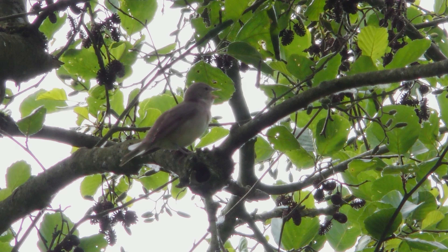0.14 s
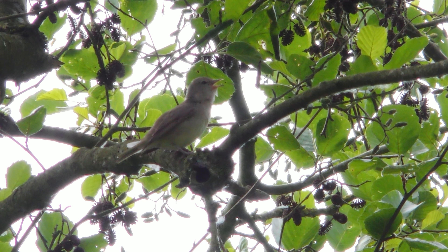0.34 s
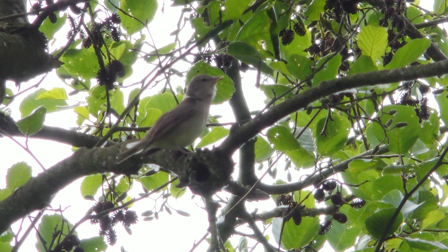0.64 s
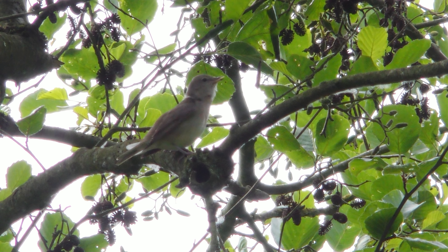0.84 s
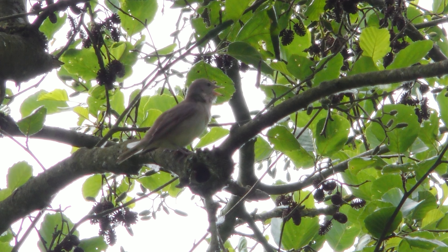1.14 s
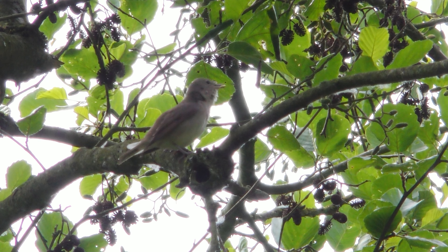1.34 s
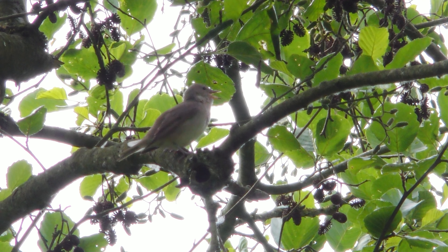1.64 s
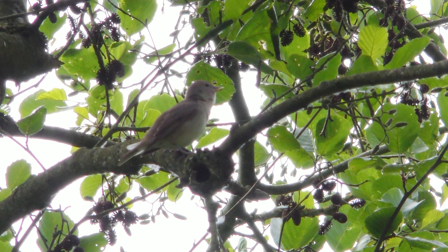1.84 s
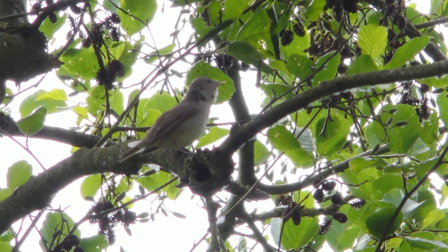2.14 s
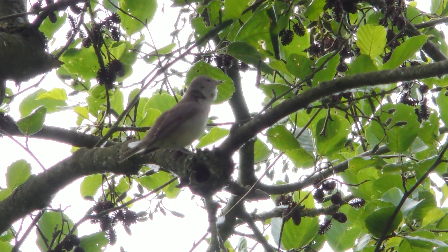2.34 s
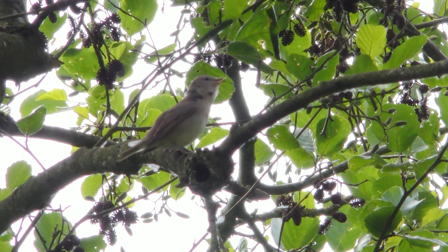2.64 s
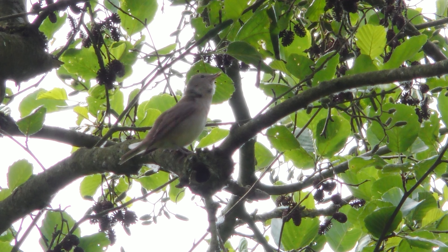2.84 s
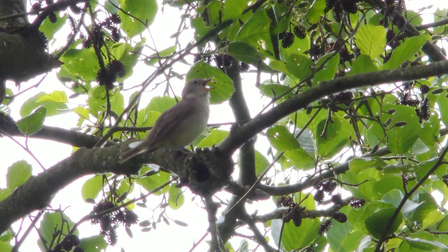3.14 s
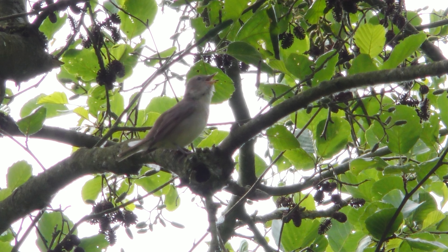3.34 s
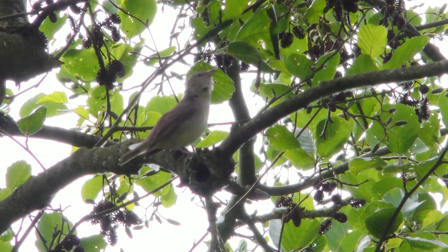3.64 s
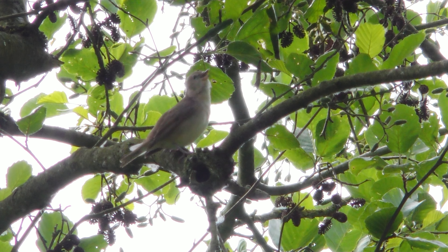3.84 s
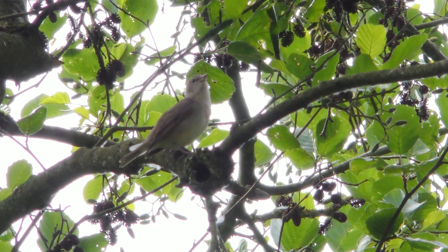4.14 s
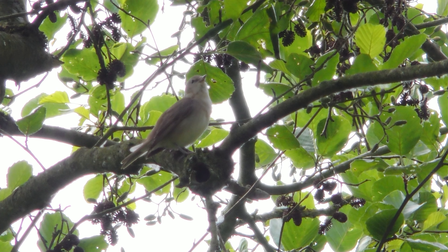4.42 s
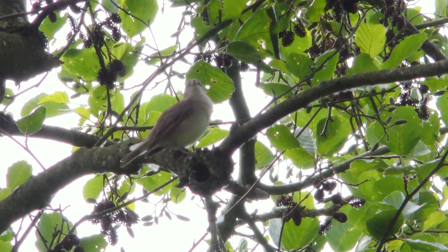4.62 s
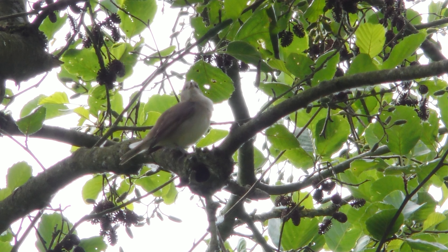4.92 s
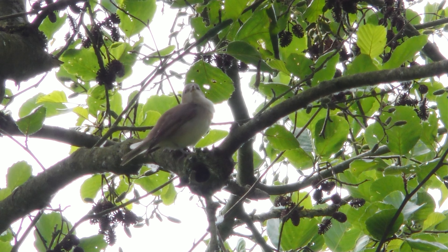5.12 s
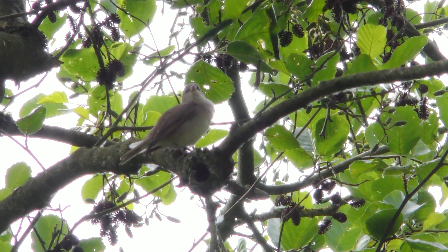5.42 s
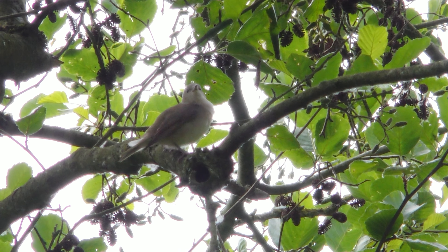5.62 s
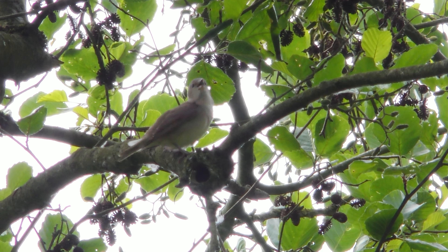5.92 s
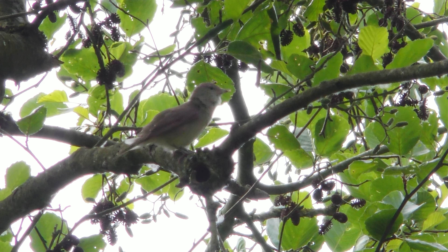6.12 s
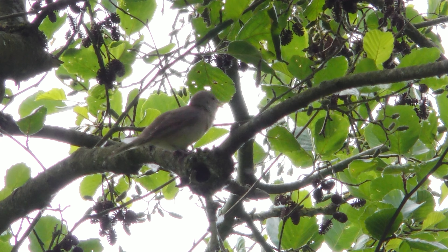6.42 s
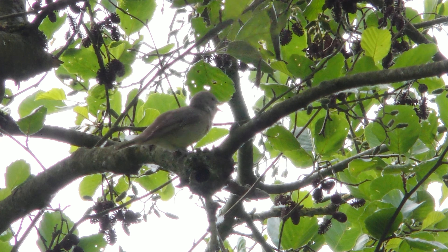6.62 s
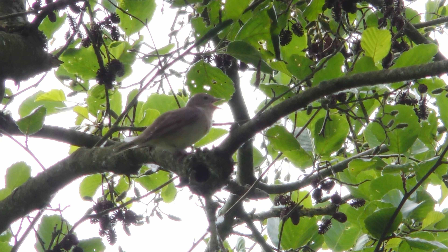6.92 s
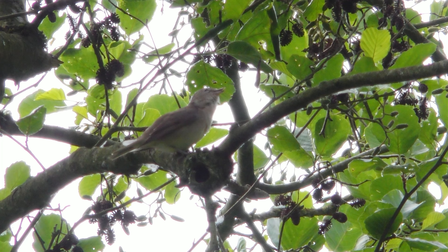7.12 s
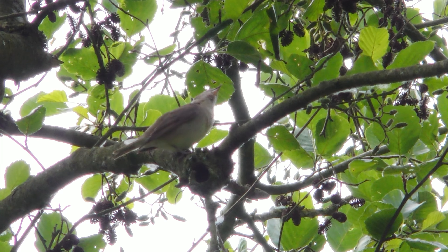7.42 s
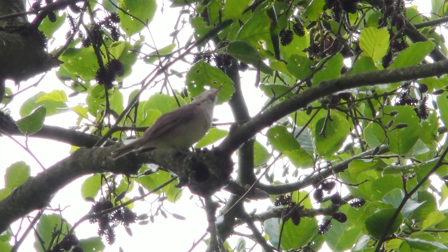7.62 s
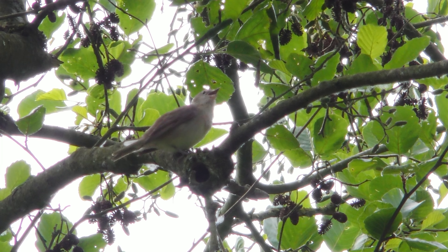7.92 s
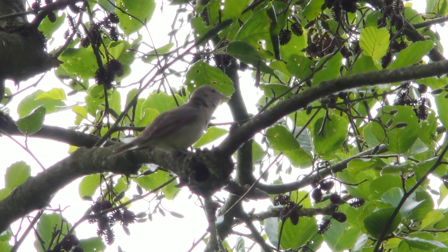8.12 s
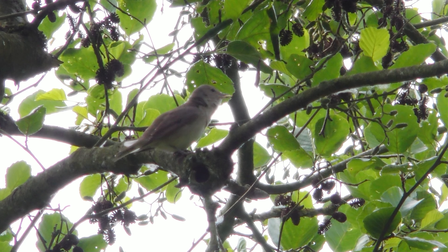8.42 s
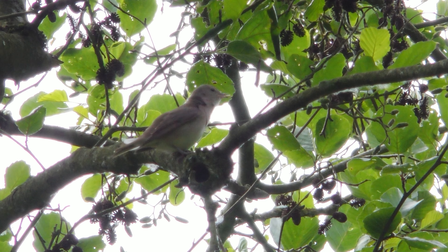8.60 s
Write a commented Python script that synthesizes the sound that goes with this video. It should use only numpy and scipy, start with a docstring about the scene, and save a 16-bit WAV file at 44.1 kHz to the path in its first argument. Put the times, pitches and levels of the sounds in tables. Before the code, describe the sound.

A small warbler perched in a leafy tree sings almost continuously: quick clear whistles, sliding chirps, clicks and short buzzy rattles, constantly changing. The brightest bursts come in the first half, around two to four seconds. A more distant bird repeats a thin, high falling note in brief series. Branches return short airy echoes. The microphone hears the singer fairly clearly, nearly mono, over a steady soft hiss.

```python
"""Warbler on a branch, neighbour further off

A warbler sings fast whistled notes, often with both sides of its syrinx at once: each is a sine on a path
of pitch and level. A neighbour at a distance repeats one high hooked note, flickering over the long path.
Leaves and trunks scatter the song back as random echoes. Under the birds lies a steady, nearly mono
hiss of shaped noise that steps down below 800 Hz.
"""
import sys
import numpy as np
from scipy import signal
from scipy.fft import rfft, irfft, next_fast_len
from scipy.io import wavfile
from scipy.ndimage import uniform_filter1d

SR = 44100
rng = np.random.default_rng(int(sys.argv[2]) if len(sys.argv) > 2 else 0)


def materialize(psi):
    """Save the field psi as 16-bit PCM at rate SR to the path in sys.argv[1].

    A 1-D psi becomes a single channel; in a 2-D psi each row is a channel.
    """
    bounded = np.clip(np.atleast_2d(psi).T, -1, 1)
    quanta = np.round(bounded * 32767).astype(np.int16)
    wavfile.write(sys.argv[1], SR, quanta)


def nominal_scale(level):
    """Amplitude ratio for a level in decibels (scalar or array-like)."""
    x = np.asarray(level, float) / 20
    return 10 ** x


N = 386316  # length in samples

ARCH_ROUND = 0.81  # power of the half sine in arches and warbles; below 1 is rounder
PATH_HZ = 2000  # points per second on the paths of warbles and rattles


def coloured(points, offset_db):
    """Noise whose spectrum follows (frequency [Hz], relative level [dB]) points on a log axis."""
    hz, db = np.transpose(points)
    size = next_fast_len(N)
    bins_hz = np.arange(size // 2 + 1) * SR / size
    level_db = np.interp(np.log(bins_hz + 1), np.log(hz), db) + offset_db
    white = rfft(rng.standard_normal(size))
    return irfft(white * nominal_scale(level_db), size)[:N]


def hiss():
    """Steady background hiss: one shaped noise for the middle, a fainter shaped noise for the sides."""
    # spectrum common to both channels: (frequency [Hz], relative level [dB])
    hiss_mid = [(15, -55.5), (45, -64.5), (65, -73.5), (150, -76.5), (760, -77.5), (800, -65), (850, -66),
                (875, -72.5), (905, -65.5), (2000, -65.5), (5000, -65), (8000, -68.5), (15600, -71),
                (15780, -130)]
    # spectrum of the left-right difference: (frequency [Hz], relative level [dB])
    hiss_side = [(15, -58.5), (60, -87), (250, -112), (780, -108), (900, -100), (1100, -110), (3500, -94),
                 (5200, -100), (6300, -81), (7200, -102.5), (15600, -108.5), (15780, -150)]
    return coloured(hiss_mid, 27.24), coloured(hiss_side, 26.6)


def wobble(rate):
    """Smooth chance with spread 1 that changes about rate times a second."""
    k = max(int(SR / rate), 1)
    smooth = uniform_filter1d(uniform_filter1d(rng.standard_normal(N), k), k)
    return smooth / smooth.std()


def add_whistle(out, note, waver, flutter_db):
    """One whistle: a sine on the pitch and level path, with soft edges."""
    edge_s = 0.005
    s, hz, db = np.transpose(note)
    s = np.maximum.accumulate(s)
    first = max(int((s[0] - edge_s / 2) * SR), 0)
    last = min(int((s[-1] + edge_s / 2) * SR), N)
    i = np.arange(first, last)
    t = i / SR
    edge = np.clip(np.minimum(t - t[0], t[-1] - t) / edge_s, 0, 1)
    # notes below -38 dB come through more foliage and arrive up to 4 times as ragged
    ragged = 1 + np.clip(-38 - db.max(), 0, 9) / 3
    # muscles round the corners of the path
    path_hz = uniform_filter1d(np.interp(t, s, hz), 60, mode="nearest")
    pitch_hz = path_hz * (1 + ragged * waver[i])
    phase = 2 * np.pi * (np.cumsum(pitch_hz) / SR + rng.random())
    level_db = np.interp(t, s, db) + ragged * flutter_db[i]
    out[i] += np.sqrt(2) * edge * nominal_scale(level_db) * np.sin(phase)


def warbler():
    """The near bird: every kind of note bends pitch and level by its own rule; levels are before the mix."""
    # long shaped phrases, one path each: (time [s], pitch [Hz], level [dB])
    phrases = [
        [(1.193, 4130, -43), (1.217, 4070, -25), (1.247, 3750, -28), (1.258, 3570, -24), (1.269, 3080, -28.5),
         (1.275, 2530, -38), (1.29, 3380, -32), (1.302, 3600, -40)],
        [(1.514, 5920, -36), (1.522, 4000, -25), (1.525, 3530, -30.5), (1.542, 3600, -25), (1.548, 4060, -36),
         (1.56, 4150, -34), (1.57, 3600, -28.5), (1.593, 2750, -29.5), (1.612, 2600, -42)],
        [(3.372, 4370, -34), (3.388, 4455, -20), (3.392, 3780, -24), (3.398, 3460, -18), (3.412, 3250, -32),
         (3.43, 3168, -20), (3.458, 3120, -19), (3.467, 2960, -41)],
        [(4.131, 3100, -35), (4.139, 3670, -28), (4.146, 5240, -29), (4.153, 4600, -27.5), (4.16, 4250, -23),
         (4.167, 4390, -29), (4.171, 4020, -31), (4.176, 4480, -26)],
        [(8.502, 2165, -50), (8.534, 2510, -27), (8.539, 2850, -31), (8.552, 2296, -40), (8.562, 2630, -30),
         (8.57, 2410, -33), (8.584, 2580, -35.5), (8.59, 1800, -37), (8.597, 1810, -52)],
    ]
    # plain slurs and strokes: (start [s], end [s], first pitch [Hz], last pitch [Hz], middle level [dB])
    slurs = [(0.001, 0.006, 3530, 3680, -36), (0.021, 0.05, 3630, 3540, -48),
             (0.076, 0.093, 4060, 4180, -39), (0.078, 0.095, 3070, 3180, -37.5),
             (0.127, 0.147, 4060, 4020, -40), (0.128, 0.15, 5090, 5020, -41.5),
             (0.251, 0.294, 3290, 4140, -47), (0.272, 0.281, 3960, 5450, -37),
             (0.295, 0.3, 5560, 3670, -32), (0.299, 0.307, 5300, 5000, -35.5),
             (0.366, 0.386, 2100, 3140, -44), (0.374, 0.398, 4440, 3950, -49),
             (0.442, 0.452, 2960, 2580, -32.5), (0.55, 0.558, 2190, 2920, -37.5),
             (0.566, 0.577, 2000, 2500, -39.5), (0.585, 0.597, 1950, 2450, -40),
             (0.606, 0.624, 2000, 2300, -40.5), (0.624, 0.674, 5280, 5020, -45.5),
             (0.725, 0.83, 4700, 4870, -49.5), (1.008, 1.02, 3250, 1790, -41),
             (1.065, 1.078, 4540, 3130, -33.5), (1.072, 1.081, 5180, 3780, -26.5),
             (1.087, 1.097, 4930, 4800, -32.5), (1.139, 1.144, 3300, 1900, -35.5),
             (1.343, 1.365, 5020, 5100, -44), (1.363, 1.37, 5070, 4000, -40),
             (1.376, 1.385, 4040, 4740, -37), (1.418, 1.425, 2200, 2900, -40),
             (1.425, 1.441, 2180, 2230, -38.5), (4.185, 4.199, 3465, 3400, -27.5),
             (5.076, 5.13, 4580, 4600, -50), (1.426, 1.438, 3000, 3050, -43),
             (1.655, 1.668, 5250, 4900, -33), (1.672, 1.706, 5140, 5470, -29),
             (1.707, 1.737, 5400, 5500, -39), (1.66, 1.71, 3790, 4030, -41.5),
             (1.811, 1.818, 2380, 2900, -41), (1.818, 1.827, 2410, 2170, -39),
             (1.816, 1.832, 3030, 3140, -40), (1.956, 1.996, 1815, 2060, -40.5),
             (2.004, 2.046, 2620, 1787, -37), (1.999, 2.055, 5630, 5460, -47),
             (2.046, 2.109, 1750, 1554, -48), (2.229, 2.355, 2070, 1914, -38),
             (2.421, 2.479, 1470, 1520, -49), (2.875, 2.91, 1556, 1530, -53),
             (3.204, 3.212, 5380, 4760, -28), (3.217, 3.224, 5410, 4450, -22.5),
             (3.229, 3.242, 5350, 4245, -24.5), (3.246, 3.256, 5090, 4260, -22),
             (3.256, 3.261, 5040, 4260, -26), (3.301, 3.326, 2745, 2480, -33),
             (3.382, 3.392, 6250, 4500, -37), (3.577, 3.613, 4170, 3870, -52),
             (3.891, 4.122, 5130, 5000, -52), (4.315, 4.33, 3950, 3300, -48),
             (3.701, 3.71, 2600, 1890, -44), (3.747, 3.762, 2240, 1780, -37.5),
             (3.802, 3.817, 2360, 1800, -38), (3.835, 3.876, 1989, 1890, -37),
             (3.921, 3.941, 4800, 3310, -42), (4.377, 4.46, 4040, 4080, -50),
             (4.617, 4.708, 4950, 5020, -48), (4.652, 4.664, 4460, 3490, -41),
             (5.011, 5.075, 4597, 4620, -41), (5.43, 5.478, 5550, 4670, -52),
             (5.772, 5.898, 3920, 3986, -50.5), (5.779, 5.8, 2820, 2830, -45),
             (5.867, 5.878, 2600, 3060, -40), (5.93, 5.963, 1926, 1890, -50.5),
             (6.045, 6.075, 3610, 3050, -44), (6.065, 6.1, 2310, 2350, -49), (6.11, 6.19, 1800, 1850, -55),
             (6.572, 6.599, 3750, 4160, -37), (6.601, 6.702, 4110, 3880, -43),
             (6.938, 6.953, 4980, 4050, -41), (6.31, 6.32, 3360, 2550, -35),
             (6.322, 6.347, 2530, 1440, -48), (6.371, 6.395, 1720, 3430, -37),
             (6.601, 6.64, 5500, 5630, -50), (6.66, 6.72, 5480, 5400, -48), (6.76, 6.786, 3510, 2290, -46),
             (6.796, 6.831, 5200, 5000, -47), (6.968, 7.012, 6440, 6120, -49.5),
             (7.114, 7.132, 2795, 2770, -45), (7.279, 7.34, 3950, 4120, -49),
             (7.325, 7.338, 3300, 3770, -35.5), (7.336, 7.358, 2680, 2070, -40),
             (7.843, 7.852, 5170, 3500, -34), (7.903, 7.912, 5050, 3500, -34),
             (7.42, 7.437, 2920, 3050, -45), (7.558, 7.594, 3000, 3170, -40.5),
             (7.66, 7.682, 3490, 3390, -40), (7.997, 8.034, 5120, 3860, -32.5),
             (8.055, 8.18, 3450, 3450, -50), (8.115, 8.136, 4080, 4034, -31),
             (8.136, 8.172, 2800, 1830, -42), (8.187, 8.21, 3230, 3340, -42),
             (8.21, 8.266, 3520, 3760, -43), (8.27, 8.361, 3590, 3700, -51),
             (8.266, 8.285, 2100, 2340, -43.5), (8.29, 8.322, 1670, 1580, -46.5),
             (8.372, 8.383, 3304, 2720, -36.5), (8.379, 8.395, 2774, 3160, -37),
             (8.424, 8.434, 3820, 2930, -40), (8.653, 8.666, 1500, 1500, -52),
             (8.74, 8.756, 2280, 2100, -34)]
    # quick rise onto a note that dies away: (start [s], end [s], foot [Hz], knee [Hz], level [dB])
    flicks = [(0.007, 0.06, 3680, 5020, -27.5), (1.768, 1.817, 3170, 4240, -25.5),
              (5.81, 5.836, 2410, 2830, -28.5), (6.47, 6.488, 4230, 5900, -30),
              (8.088, 8.123, 1870, 2630, -30)]
    # arches and scoops, out and back: (start [s], end [s], edge [Hz], turn [Hz], loudest level [dB])
    arches = [(0.235, 0.301, 4870, 5470, -37.5), (1.658, 1.733, 4020, 4420, -34),
              (0.622, 0.737, 1890, 2010, -37.5), (2.797, 2.871, 1710, 2023, -33),
              (3.047, 3.11, 5900, 6260, -41), (3.083, 3.118, 3650, 5360, -22),
              (3.53, 3.546, 3530, 2756, -23), (3.569, 3.582, 3570, 2760, -25),
              (6.444, 6.472, 4450, 4110, -38), (6.539, 6.571, 3910, 3280, -24),
              (7.431, 7.468, 3210, 3890, -33), (7.594, 7.624, 3230, 3380, -30),
              (7.679, 7.707, 3590, 3880, -31), (7.706, 7.733, 3600, 4030, -33),
              (7.739, 7.765, 3890, 4130, -29.5)]
    # slurs that grow and are cut off: (start [s], end [s], first [Hz], last [Hz], peak level [dB])
    swells = [(0.41, 0.441, 4020, 2860, -24.5), (0.799, 0.851, 2625, 2525, -28.5),
              (1.374, 1.397, 3100, 4700, -28), (2.179, 2.215, 3230, 3066, -18),
              (2.558, 2.594, 2400, 2165, -26.5), (2.905, 2.956, 1750, 1878, -29),
              (3.539, 3.55, 3200, 3550, -20), (3.579, 3.587, 3200, 3590, -18),
              (3.122, 3.158, 3300, 3994, -19), (3.935, 3.973, 2600, 2490, -22.5),
              (7.613, 7.656, 3370, 3570, -26), (6.886, 6.94, 4500, 5280, -32.5),
              (8.428, 8.441, 2980, 2830, -24.5)]
    # quick fall onto a held note that creeps up: (start [s], end [s], top [Hz], knee [Hz], level [dB])
    hooks = [(0.655, 0.71, 5100, 3420, -46), (0.972, 1.04, 5000, 4390, -43), (5.068, 5.14, 4500, 3770, -46),
             (2.038, 2.104, 5200, 3340, -45), (2.339, 2.404, 5000, 3870, -45.5),
             (2.721, 2.785, 5300, 3380, -44), (2.861, 2.95, 4800, 4030, -45.5),
             (3.014, 3.084, 5000, 3830, -41.5), (3.512, 3.58, 4450, 3950, -37),
             (3.688, 3.748, 4750, 4380, -42.5), (4.238, 4.32, 5000, 3970, -33.5),
             (4.785, 4.833, 4650, 3450, -48), (6.158, 6.22, 4800, 3370, -47.5),
             (6.835, 6.89, 4200, 3390, -45), (7.172, 7.249, 4500, 3850, -41),
             (7.459, 7.59, 5150, 4300, -41), (7.993, 8.05, 3950, 3430, -41),
             (8.203, 8.242, 5800, 5100, -53)]
    # fast even vibrato that opens and closes: (start [s], end [s], low [Hz], top [Hz], peak level [dB])
    warbles = [(0.838, 0.909, 2360, 3230, -32.5), (2.597, 2.732, 2053, 2870, -24.5)]
    # rattles: (start [s], centre [Hz], swing [Hz], beat rate [1/s], level [dB])
    rattles = [(3.05, 6060, 500, 120, -39), (6.025, 3510, 900, 77, -40), (6.44, 5300, 1200, 124, -41.5),
               (6.782, 2740, 480, 98, -37), (6.94, 4470, 900, 93, -42), (6.985, 4450, 900, 100, -45.5),
               (7.278, 4440, 800, 110, -45), (7.953, 5270, 1400, 82, -35.5), (7.955, 2770, 645, 93, -44),
               (8.686, 6000, 900, 99, -50)]
    out = np.zeros(N)
    waver = 0.003 * wobble(300)  # fraction of the pitch
    flutter_db = 0.9 * wobble(250)
    notes = list(phrases)
    notes += [bend(*row, foot_db=1, fade_db_per_s=47) for row in hooks]
    notes += [bend(*row, foot_db=15, fade_db_per_s=396) for row in flicks]
    for rule, rows in ((slur, slurs), (arch, arches), (swell, swells), (warble, warbles), (trill, rattles)):
        notes += [rule(*row) for row in rows]
    for note in notes:
        add_whistle(out, note, waver, flutter_db)
    return out


def slur(start, end, first_hz, last_hz, db):
    """A straight glide whose level sags in the middle."""
    sag_db = 3
    middle = ((start + end) / 2, (first_hz + last_hz) / 2, db)
    return [(start, first_hz, db + sag_db), middle, (end, last_hz, db + sag_db)]


def scatter(x, db, t60, delay_s, density):
    """Reflections: random taps, about density a second, that fade 60 dB in t60; total energy db."""
    t = np.arange(int(t60 * SR)) / SR
    struck = rng.random(len(t)) < density / SR
    taps = rng.standard_normal(len(t)) * struck * (t > delay_s)
    taps = taps * nominal_scale(-60 * t / t60)
    taps = taps * nominal_scale(db) / np.sqrt(np.sum(taps ** 2) + 1e-18)
    return signal.fftconvolve(x, taps)[:N]


def rustle(x, rate, sway_s):
    """Moving leaves shake the path length, which smears a pure note."""
    return np.interp(np.arange(N) + sway_s * SR * wobble(rate), np.arange(N), x)


def side_echo(birds):
    """Faint early reflections, opposite in the two channels, give the birds a little width."""
    return scatter(birds, -33, t60=0.038, delay_s=0.001, density=3000)


def leaf_light(birds):
    """Leaves and twigs throw back short waves better than long ones: a high-pass at 2600 Hz."""
    return signal.sosfilt(signal.butter(2, 2600, "high", fs=SR, output="sos"), birds)


def branch_echo(bright):
    """Close echoes from branches: a short burst of sparse reflections, shaken a little."""
    return rustle(scatter(bright, -4, t60=0.05, delay_s=0.003, density=1500), 25, 0.00003)


def bend(start, end, first_hz, knee_hz, db, foot_db, fade_db_per_s):
    """The syrinx muscles settle onto the knee pitch, then the hold creeps up and fades."""
    settle_s, creep_hz_per_s = 0.008, 2490
    t = np.linspace(0, end - start, num=33)
    away = np.exp(-t / settle_s)
    hz = knee_hz + (first_hz - knee_hz) * away + creep_hz_per_s * t
    return np.transpose([start + t, hz, db - foot_db * away - fade_db_per_s * t])


def wood_tail(bright):
    """The long tail of the wood: dense reflections, with leaves shaking the path before and after."""
    shaken = rustle(bright, 62, 0.00009)
    return rustle(scatter(shaken, -11, t60=0.59, delay_s=0.0084, density=9000), 60, 0.00009)


def arch(start, end, edge_hz, turn_hz, db):
    """Out and back along a rounded path; the higher the pitch, the louder."""
    range_db = 9.5
    u = np.linspace(0, 1, num=33)
    out = np.abs(np.sin(np.pi * u)) ** ARCH_ROUND
    height = out if turn_hz > edge_hz else 1 - out
    hz = edge_hz + (turn_hz - edge_hz) * out
    return np.transpose([start + u * (end - start), hz, db - range_db * (1 - height)])


def swell(start, end, first_hz, last_hz, db):
    """A glide whose level climbs to a late peak and drops."""
    rise_db, cut_db, peak_at = 18, 11.5, 0.78  # peak_at is a share of the note's length
    peak = (start + peak_at * (end - start), first_hz + peak_at * (last_hz - first_hz), db)
    return [(start, first_hz, db - rise_db), peak, (end, last_hz, db - cut_db)]


def warble(start, end, low_hz, top_hz, db):
    """Vibrato under a dome: every beat leaps up loud and falls back soft."""
    beat_hz, dip_db, edge_db = 61.1, 9, 6.5
    floor = 0.45  # share of the dome's height left between beats
    s = np.arange(start, end, 1 / PATH_HZ)
    dome = np.abs(np.sin(np.pi * (s - start) / (end - start))) ** ARCH_ROUND
    beat = 0.5 - 0.5 * np.cos(2 * np.pi * beat_hz * (s - start))
    hz = low_hz + (top_hz - low_hz) * dome * (floor + (1 - floor) * beat)
    return np.transpose([s, hz, db - dip_db * (1 - beat) - edge_db * (1 - dome)])


def neighbour():
    """The far bird: one note shape, a little different each time; air on the long path makes it flicker."""
    # turn that opens its first phrase: (time [s], pitch [Hz], level [dB])
    opening_turn = [(1.76, 4480, -40), (1.778, 6860, -41), (1.785, 6760, -45), (1.798, 6030, -43),
                    (1.812, 6430, -40.5), (1.854, 5340, -42)]
    # falling hook, from the note's start: (time [s], pitch [Hz], relative level [dB])
    hook_voice = [(0.003, 6290, -3), (.011, 6950, -2), (.02, 5950, 1), (.032, 5580, 0), (.066, 5460, -3.5)]
    # thin upper voice, from the note's start: (time [s], pitch [Hz], relative level [dB])
    upper_voice = [(.022, 7340, -11), (.04, 6920, -4), (.07, 6850, -10)]
    # repeats of the note: (start [s], level [dB])
    repeats = [(1.91, -41.5), (2.05, -43.5), (2.208, -43.5), (4.694, -46.5), (4.793, -44), (4.912, -43),
               (5.045, -44), (5.187, -45), (8.57, -43), (8.684, -51)]
    out = np.zeros(N)
    waver = 0.0018 * wobble(210)  # fraction of the pitch
    flutter_db = 0.61 * wobble(120)
    add_whistle(out, opening_turn, waver, flutter_db)
    for start, db in repeats:
        detune = 1 + 0.0073 * rng.standard_normal()
        for voice in (hook_voice, upper_voice):
            note = np.array(voice) * [1, detune, 1] + [start, 0, db]
            add_whistle(out, note, waver, flutter_db)
    return out


def trill(start, centre_hz, swing_hz, rate, db):
    """A rattle: the pitch is thrown up and down unevenly, each beat pushed louder at the top."""
    length_s = 0.056
    s = np.arange(start, start + length_s, 1 / PATH_HZ)
    slip, reach, effort = (wobble(65)[:len(s) * 20:20] for _ in range(3))
    beat = np.sin(2 * np.pi * rate * (s - start) + 0.24 * slip)
    hz = centre_hz + swing_hz * beat * (1 + 0.17 * reach)
    swell_db = -9 * (2 * (s - start) / length_s - 1) ** 2
    return np.transpose([s, hz, db + 1.0 * beat + swell_db + 2 * effort])


def scene():
    """Birds, close echoes from branches, the long tail of the wood, and the hiss; nearly mono."""
    hiss_mid, hiss_side = hiss()
    birds = warbler() + neighbour()
    bright = leaf_light(birds)
    mid = nominal_scale(-1.52) * birds + branch_echo(bright) + wood_tail(bright) + hiss_mid
    side = hiss_side + side_echo(birds)
    return np.array([mid + side, mid - side])


def low_pass(x):
    """Removes everything above the highest recorded frequency."""
    return signal.sosfilt(signal.butter(12, 17020, fs=SR, output="sos"), x)


def record(dry):
    """Turns the finished stereo mix into the sound that is written out."""
    return low_pass(dry)


dry = scene()
out = record(dry)
materialize(out)
```